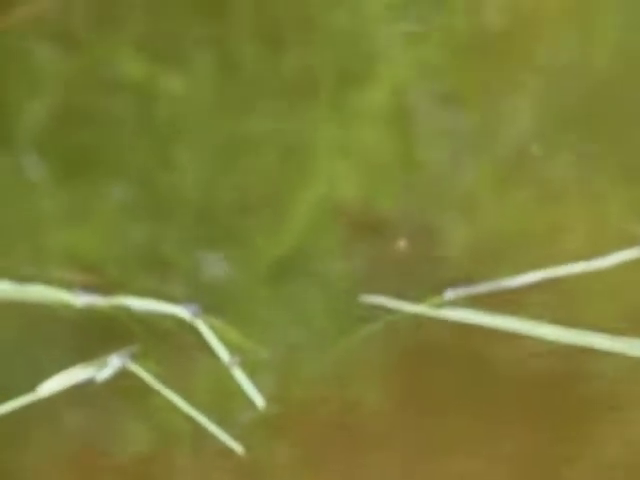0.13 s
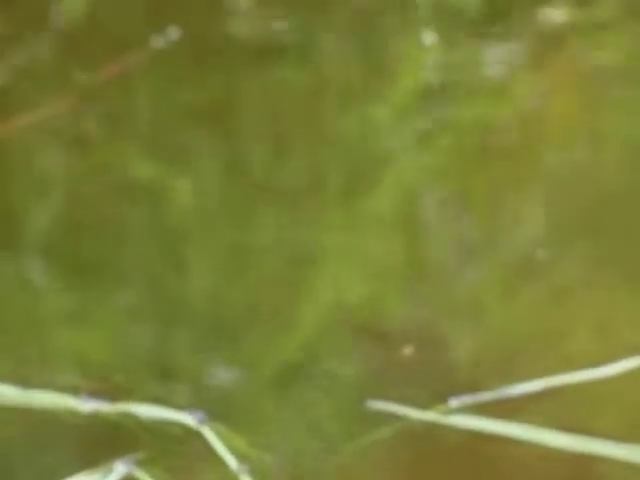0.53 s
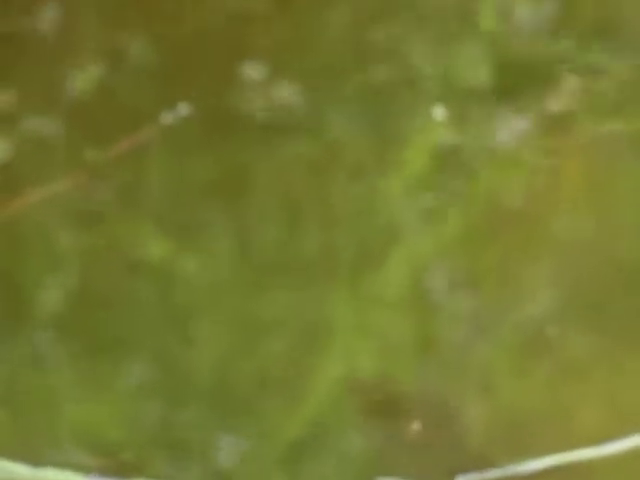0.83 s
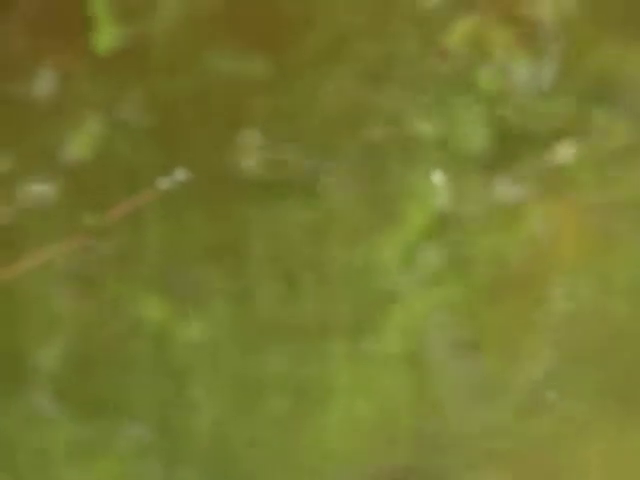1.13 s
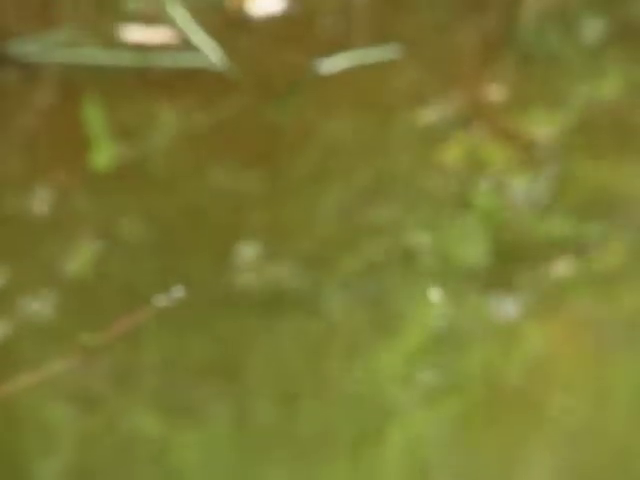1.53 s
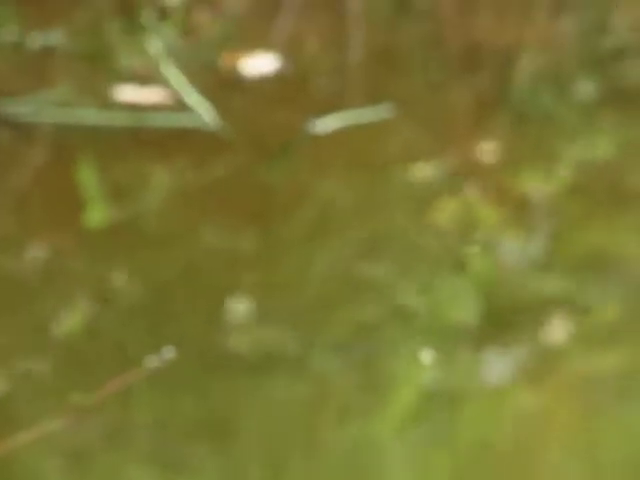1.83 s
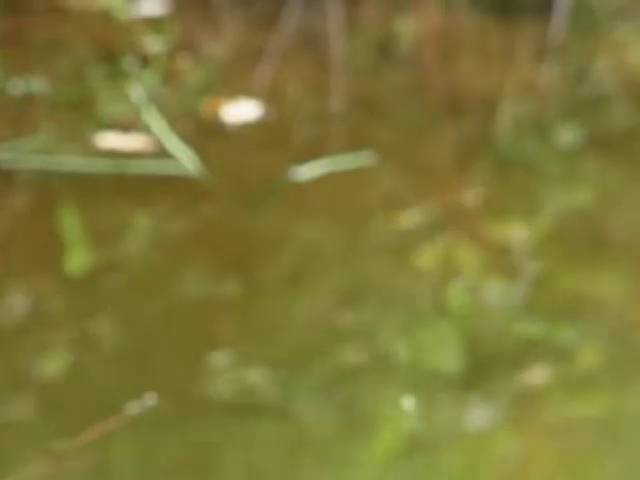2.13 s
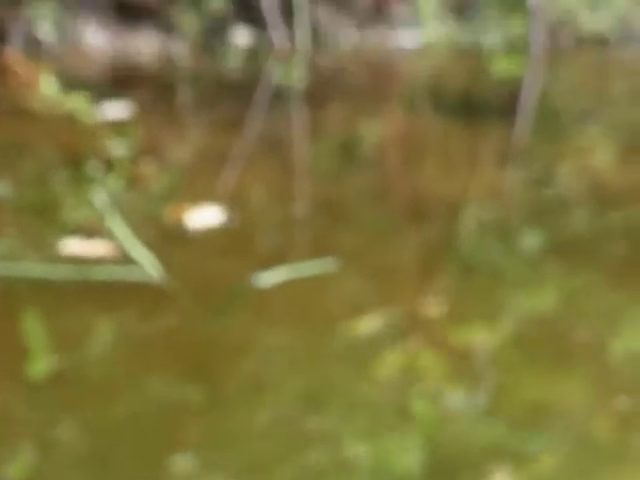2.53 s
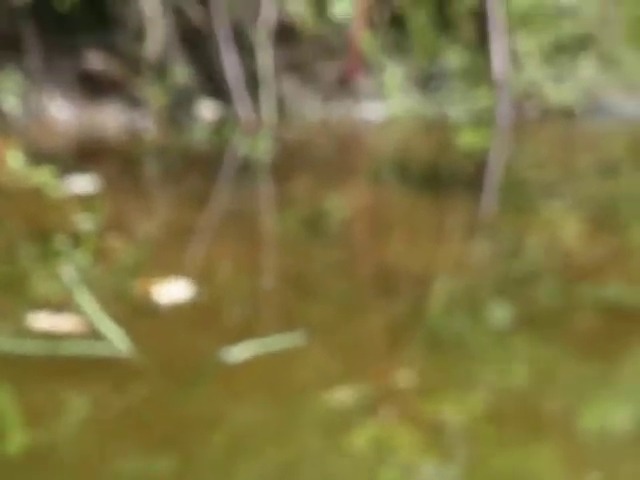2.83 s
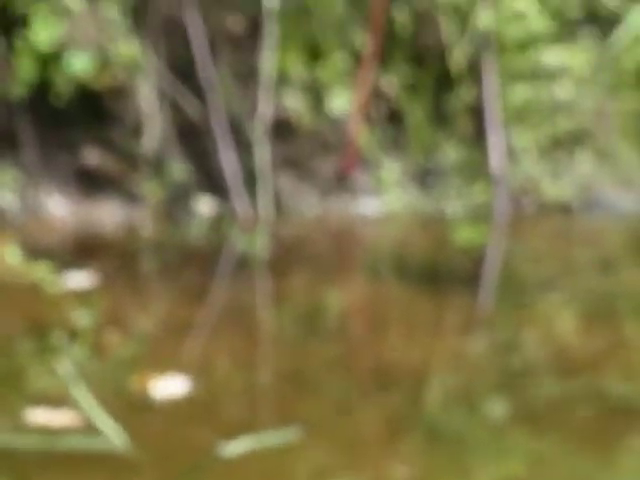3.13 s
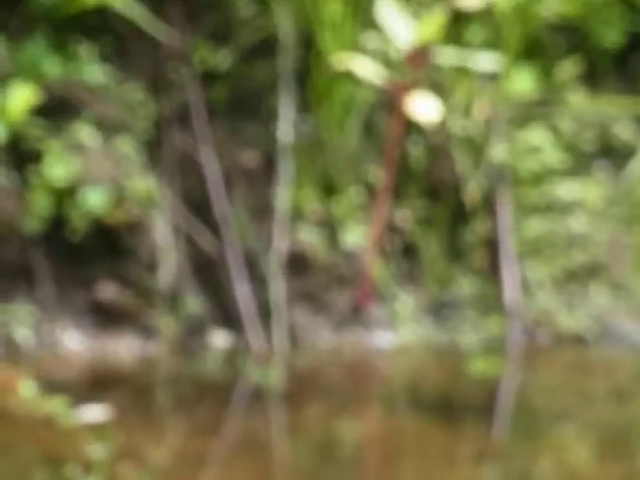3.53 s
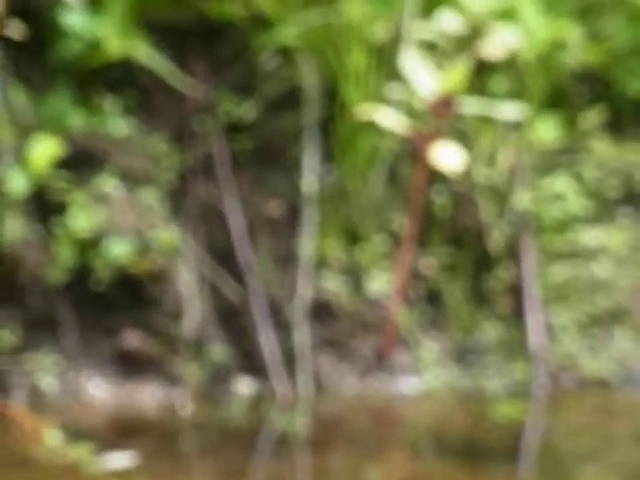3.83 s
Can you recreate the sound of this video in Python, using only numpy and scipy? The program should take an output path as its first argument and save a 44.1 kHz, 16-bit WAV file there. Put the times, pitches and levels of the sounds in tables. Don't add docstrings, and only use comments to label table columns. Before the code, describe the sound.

An unseen toad close by gives short, soft, even hoots beside a wooded pond; birds whistle and trill with echoes, fainter toads answer, and the hissy handheld camera microphone catches lens noise and a final sharp click.

```python
import sys
import numpy as np
from scipy import signal
from scipy.fft import rfft, irfft
from scipy.io import wavfile
from scipy.ndimage import uniform_filter1d

SR = 44100
rng = np.random.default_rng(int(sys.argv[2]) if len(sys.argv) > 2 else 0)


def wav_record(signal):
    frames = np.transpose(np.atleast_2d(signal))
    bounded = np.clip(frames, -1, 1)
    quanta = np.round(bounded * 32767).astype(np.int16)
    wavfile.write(sys.argv[1], SR, quanta)


def invert_db(level):
    return 10 ** (np.asarray(level, dtype=float) / 20)


N = 176400

# [f/Hz, density/dB]
AIR_SPECTRUM = [(25, -5), (55, -18), (140, -12), (280, -8.5), (480, -11.5), (1000, -17.5), (2500, -17.5),
                (15800, -24.5)]
# [start t/s, f/Hz, level/dB]
HOOTS = [(.086, 563.6, -37), (0.543, 562.6, -37), (.952, 563.4, -37), (1.37, 565.5, -36.5),
         (1.79, 564, -36.5), (2.22, 563, -37.5), (2.625, 563.7, -36.5), (3.047, 563.6, -37),
         (3.479, 563.5, -37), (3.91, 561, -37)]
# [t after start/s, level/dB, octave partial level/dB]
HOOT_COURSE = [
    (0, -19.5, -11),
    (.01, -2, -19.5),
    (.025, -0.5, -20.5),
    (.085, -4, -19.5),
    (.135, -4, -27),
    (0.151, -13, -13.5),
    (.168, -24, -32),
]
TOOTH_TIMES = [.1061, .1066, .1073, .1078, .1083, .1088, .1096]
# [level/dB, share of dull body as a factor]
TOOTH_HITS = [
    (-26.5, 0.045),
    (-20, .1),
    (-13.5, 0.47),
    (-25, 0.35),
    (-19, 0.1),
    (-25.5, 0.24),
    (-31.5, 2.1),
]
# [f/Hz, width/Hz, level/dB]
BARREL_MODES = [(332, 70, -15.5), (890, 290, -13.5), (1680, 320, -9.5), (2250, 580, -9.5), (4600, 840, -7),
                (7100, 670, -8.5), (9600, 800, -5), (11140, 520, -2.5), (13300, 700, -7.5),
                (15400, 800, -7)]
# [start t/s, length/s, from f/Hz, to f/Hz, level/dB]
FAR_WHISTLES = [(.11, 0.025, 5590, 5280, -59), (1.06, 0.0334, 5550, 5050, -59),
                (1.1, 0.015, 4420, 4200, -60), (2.08, 0.15, 1932, 1965, -67),
                (2.26, 0.03, 2246, 2110, -58.5), (2.5, 0.137, 2250, 2370, -65),
                (2.64, 0.039, 8320, 8500, -66), (3.27, 0.057, 8740, 8070, -66),
                (3.22, 0.048, 4680, 4240, -59), (3.47, 0.044, 3960, 3080, -56.5),
                (1.63, 0.011, 6650, 5180, -55), (1.95, 0.031, 3118, 3125, -57)]
# [start t/s, length/s, level/dB]
MOTOR_RUNS = [
    (.2, 0.42, -69.5),
    (1.227, 0.41, -65.5),
    (2.22, 0.56, -71.5),
    (3.23, 0.25, -68),
]
# [start t/s, length/s, from f/Hz, to f/Hz, level/dB]
FAR_TOADS = [
    (.24, 0.17, 511, 456, -63),
    (.79, 0.12, 507, 488, -65.5),
    (.92, 0.13, 492, 467, -63.5),
    (1.18, 0.17, 482, 470.7, -59),
    (1.69, 0.087, 505, 523, -61.5),
    (2.93, 0.13, 551, 515, -67),
    (3.06, 0.12, 487, 469, -63),
    (3.64, 0.36, 505.5, 470, -62),
]
# [level/dB, path of (t/s, f/Hz)]
WARBLER_PHRASES = [(-58, [(.437, 6600), (.45, 5200), (.465, 4850), (.505, 4730)]), (-53.5, [(1.354, 4410),
                   (1.366, 3590), (1.376, 3450)]), (-57.5, [(1.378, 3290), (1.384, 2784), (1.391, 3540),
                   (1.41, 3730)]), (-55, [(1.49, 4550), (1.501, 3620), (1.52, 3260)]), (-54, [(1.522, 2790),
                   (1.53, 3440), (1.575, 3910), (1.615, 3860)]), (-55, [(1.632, 3800), (1.645, 3850),
                   (1.66, 3170), (1.67, 2890), (1.678, 3510), (1.7, 3490)]), (-53, [(1.78, 4400),
                   (1.79, 3920)]), (-50, [(1.792, 3640), (1.806, 3070), (1.812, 2770)]),
                   (-51, [(1.815, 2615), (1.822, 3040), (1.834, 3500)]), (-50.5, [(2.21, 3384),
                   (2.232, 2815), (2.25, 2600)]), (-52, [(2.394, 1900), (2.403, 2695), (2.415, 3280),
                   (2.437, 3720)])]
# [level/dB, path of (t/s, f/Hz)]
NEAR_SONG = [(-52, [(1.195, 5200), (1.215, 4750), (1.25, 4540), (1.285, 4330)]), (-56.5, [(1.37, 8140),
             (1.42, 7860), (1.455, 7560), (1.475, 7450)]), (-49, [(1.71, 6450), (1.73, 6800), (1.745, 7110),
             (1.76, 6820), (1.775, 6180)]), (-48, [(2.503, 7600), (2.52, 6600), (2.54, 6720)]),
             (-48, [(2.525, 6680), (2.57, 6840), (2.67, 7100)]), (-45, [(2.72, 3680), (2.76, 3910),
             (2.81, 4225)]), (-47, [(2.868, 3480), (2.91, 3803), (2.945, 3970), (2.97, 4080)]),
             (-42.5, [(3.004, 5240), (3.012, 6130), (3.025, 6385), (3.11, 6455)]), (-41, [(3.372, 5250),
             (3.38, 5794), (3.415, 5880), (3.445, 4650)]), (-51, [(3.49, 8640), (3.5, 8230), (3.56, 8680)]),
             (-44.5, [(3.576, 5200), (3.58, 6670), (3.587, 6000)]), (-41.5, [(3.586, 5880), (3.592, 5280),
             (3.605, 4600), (3.632, 3650)]), (-39, [(3.685, 5440), (3.695, 6430), (3.72, 6363),
             (3.755, 4830)]), (-43, [(3.835, 7100), (3.87, 7100), (3.9, 7600), (3.935, 7200),
             (3.955, 6200)])]
# [start t/s, length/s, from f/Hz, to f/Hz, level/dB]
WARBLER_STROKES = [(1.21, 0.13, 2800, 2414, -63.5), (1.912, .016, 3700, 2700, -51),
                   (1.997, 0.012, 3700, 2650, -51), (2.077, 0.013, 3750, 2600, -49.5),
                   (2.124, 0.014, 3300, 2700, -52), (2.157, .014, 3800, 2650, -51.5),
                   (2.053, .014, 2700, 3500, -55), (1.963, .016, 3250, 2900, -54),
                   (2.495, 0.013, 3250, 2650, -52), (2.515, 0.017, 3350, 2600, -52),
                   (2.91, 0.021, 2590, 3200, -60), (2.545, .04, 2900, 2200, -61),
                   (1.24, .015, 3000, 3740, -59)]
# [t/s, level/dB, length/s]
LENS_TICKS = [
    (1.37, -45, 0.0019),
    (1.4, -48, 0.0034),
    (1.51, -53, 0.0043),
    (1.67, -49.5, 0.0069),
    (3.24, -48.5, 0.01),
    (3.441, -44, 0.0039),
]
# [f/Hz, level/dB]
TICK_COLOUR = [(250, 3), (800, -3.5), (2000, -5), (4000, -3), (7000, -4), (8700, -13), (11300, 4.5),
               (15500, -17)]
# [f/Hz, width/Hz, level/dB]
BUTTON_MODES = [(1620, 230, 2), (1990, 320, 6), (2400, 710, 1), (5700, 430, -27), (7600, 640, 2.5),
                (10130, 3100, 6.5), (11350, 1200, -4.5), (13950, 3700, 0)]


def evened(x):
    return x / np.sqrt(np.mean(x ** 2) + 1e-20)


def read(points, hz):
    f, value = np.transpose(points)
    return np.interp(np.log(hz + 1), np.log(f + 1), value)


def add(mix, s, sound):
    part = mix[round(s * SR):][:len(sound)]
    part += sound[:len(part)]


def colour(x, points):
    return irfft(rfft(x) * invert_db(read(points, np.fft.rfftfreq(len(x), 1 / SR))), len(x))


def passed(kind, hz, x):
    return signal.sosfilt(signal.butter(2, hz, kind, fs=SR, output="sos"), x)


def whistle(mix, db, path, soft=0.37, lean=0.57):
    s, hz = np.transpose(path)
    t = np.arange(s[0], s[-1], 1 / SR)
    progress = (t - s[0]) / (s[-1] - s[0])
    arch = abs(np.sin(np.pi * progress ** lean)) ** soft
    pitch = uniform_filter1d(np.interp(t, s, hz), size=90, mode="nearest")

    drift = uniform_filter1d(rng.standard_normal(16000), size=300)
    flutter = evened(uniform_filter1d(drift, size=300))[:len(t)]
    flutter = (flutter - flutter.mean()) * min(len(t) / SR / 0.08, 1)
    level = np.sqrt(2) * invert_db(db + 2.5 * flutter)
    add(mix, s[0], level * arch * np.sin(2 * np.pi * np.cumsum(pitch) / SR))


def glides(rows, lean=0.85):
    out = np.zeros(N)
    for start, length, from_hz, to_hz, db in rows:
        whistle(out, db, [(start, from_hz), (start + length, to_hz)], lean=lean)
    return out


def wood(x, echo_db, t60=0.61, near_db=-2.5, direct_db=0):
    t = np.arange(SR) / SR
    near, far = rng.standard_normal((2, SR))
    near = near * invert_db(-60 * t / 0.12)
    far = far * invert_db(-60 * t / t60) * np.minimum(t / 0.016, 1)
    tail = invert_db(near_db) * near / np.linalg.norm(near) + invert_db(echo_db) * far / np.linalg.norm(far)
    return invert_db(direct_db) * x + signal.fftconvolve(x, tail)[:N]


def air():
    frames, hz = N // 256 + 5, np.fft.rfftfreq(1024, 1 / SR)
    a, b, patches = rng.standard_normal((frames, 513, 3)).T
    patches = uniform_filter1d(patches, size=14, axis=0)
    patches = evened(uniform_filter1d(patches, size=16, axis=1))
    rumble_band = np.exp(-np.log((hz + 1) / 296) ** 2 / 0.24)
    fade_db = 1.14 * np.outer(rumble_band, np.arange(frames) * 256 / SR)
    z = (a + 1j * b) * invert_db(read(AIR_SPECTRUM, hz)[:, None] + 0.88 * patches - fade_db)
    return invert_db(-53.5) * evened(signal.istft(z, nperseg=1024, noverlap=768)[1][:N])


def near_toad():
    out, (s, level_db, octave_db) = np.zeros(N), np.transpose(HOOT_COURSE)
    t = np.arange(0, s[-1], 1 / SR)
    octave = invert_db(np.interp(t, s, octave_db))
    for start, hz, db in HOOTS:
        waver_db = evened(uniform_filter1d(rng.standard_normal(len(t)), size=900))
        shape = uniform_filter1d(invert_db(np.interp(t, s, level_db) + waver_db), size=300)
        pitch = hz - 63 * t - 13 * (t / s[-1]) ** 4
        turn = 2 * np.pi * np.cumsum(pitch) / SR
        add(out, start, np.sqrt(2) * invert_db(db) * shape * (np.sin(turn) + octave * np.sin(2 * turn)))
    return wood(out, echo_db=-21.5, t60=0.57, near_db=-24)


def gear_teeth():
    out, t = np.zeros(N), np.arange(900) / SR
    hz, width, mode_db = np.transpose(BARREL_MODES)[:, :, None]
    for s, (db, dull) in zip(TOOTH_TIMES, TOOTH_HITS):
        detune, phase = rng.random((2, len(hz), 1))
        cycles = hz * (0.96 + 0.074 * detune) * t + phase * (hz > 4000)
        rings = invert_db(mode_db) * np.exp(-np.pi * width * t) * np.sin(2 * np.pi * cycles)
        add(out, s, invert_db(db) * (np.where(hz < 6000, dull, 1) * rings).sum(axis=0))
    return passed("high", 220, out)


def birds():
    low, near = glides(WARBLER_STROKES), near_singer()
    warbler_phrases(low)
    slow, fast, between = chip_trills()
    return (wood(near, echo_db=-1.5, direct_db=-2)
            + wood(low, echo_db=0, near_db=-9)
            + wood(glides(FAR_WHISTLES), echo_db=1.5, t60=0.4, direct_db=-4.5)
            + wood(slow, echo_db=3.5, t60=0.5, near_db=-11, direct_db=3)
            + wood(between, echo_db=3, t60=0.41, direct_db=-8)
            + wood(fast, echo_db=-2.5, near_db=-16))


def lens_motor():
    whir, t = np.zeros(N), np.arange(N) / SR
    for s, length, db in MOTOR_RUNS:
        add(whir, s, invert_db(db) * signal.windows.tukey(round(length * SR), 0.7))
    bands = np.zeros(N)
    for hz in [10900, 11500, 9900]:
        slow = signal.lfilter([1], [1, -np.exp(-np.pi * 250 / SR)], rng.standard_normal(N))
        bands += evened(slow) * np.sin(2 * np.pi * hz * t)
    wide = evened(passed("band", [8500, 13500], rng.standard_normal(N)))
    return whir * (bands + invert_db(1.5) * wide)


def far_toads():
    return wood(glides(FAR_TOADS), echo_db=-1)


def warbler_phrases(low):
    for db, path in WARBLER_PHRASES:
        whistle(low, db, path, soft=0.29)


def near_singer():
    near = np.zeros(N)
    for db, path in NEAR_SONG:
        whistle(near, db, path, soft=0.34, lean=1.1)
    return near


def lens_ticks():
    faint = np.zeros(N)
    for s, db, length in LENS_TICKS:
        n = round(length * SR)
        add(faint, s, invert_db(db) * np.hanning(n) ** 0.42 * rng.standard_normal(1000)[:n])
    return 2 * colour(passed("high", 4300, faint), TICK_COLOUR)


def trill(first_s, step_s, length_s, count, from_hz, to_hz, db, swell_db):
    rows = [(first_s + k * step_s, length_s, from_hz, to_hz, db + k * swell_db) for k in range(count)]
    return glides(rows, lean=0.55)


def chip_trills():
    slow = trill(1.831, 0.0752, 0.024, 9, from_hz=5447, to_hz=3904, db=-53, swell_db=0.5)
    fast = trill(3.129, 0.0307, 0.007, 8, from_hz=6048, to_hz=4550, db=-54, swell_db=0.6)
    between = trill(1.868, 0.075, 0.022, 9, from_hz=5300, to_hz=3950, db=-56, swell_db=0.5)
    return slow, fast, between


def button():
    out, t = np.zeros(N), np.arange(900) / SR
    add(out, 3.642, invert_db(-49) * np.hanning(900) * np.sin(2 * np.pi * 133 * t))

    snap_s, snap_db, push_db = 3.8192, -0.5, -13
    body_s = snap_s + 0.000058
    rings = []
    for hz, width, db in BUTTON_MODES:
        decay = np.exp(-np.pi * width * t)
        rings.append(invert_db(db) * (width / 900) * decay * np.sin(2 * np.pi * hz * t))
    add(out, snap_s, -invert_db(snap_db) * sum(rings[3:]))
    add(out, body_s, invert_db(snap_db) * sum(rings[:3]))
    add(out, snap_s + 0.00235, invert_db(-30) * rings[1])

    add(out, body_s - 900 / SR, -invert_db(push_db) * np.exp(-t[::-1] / 0.00066))
    rebound = np.sin(np.pi * np.minimum(t / 0.0066, 1)) ** 2
    add(out, body_s, invert_db(push_db - 1.5) * (np.exp(-t / 0.0035) - 0.38 * rebound))
    return out


def scene():
    edge = signal.firwin(401, 15800, window=("kaiser", 9), fs=SR)
    pond = near_toad() + far_toads() + birds() + air()
    camera = lens_ticks() + lens_motor() + gear_teeth() + button()
    return (signal.oaconvolve(pond, edge, "same") + camera)[None]


def low_pass(x):
    return signal.sosfilt(signal.butter(12, 17350, fs=SR, output="sos"), x)


def record(dry):
    dry = signal.sosfilt(signal.butter(3, 50.5, "high", fs=SR, output="sos"), dry)
    power_db = 10 * np.log10(abs(uniform_filter1d(dry[0] ** 2, size=200)) + 1e-12)
    fall_db = np.arange(N) * 132 / SR
    held_peak_db = np.maximum.accumulate(power_db + fall_db) - fall_db
    over_db = np.maximum(held_peak_db + 15.5, 0)
    late_db = np.concatenate([np.zeros(220), over_db])[:N]
    ducked = dry / invert_db(0.48 * late_db)
    ceiling = 0.76
    held = ceiling * np.tanh(ducked / ceiling)
    edge = signal.firwin(401, 16700, window=("kaiser", 9), fs=SR)
    return low_pass(signal.oaconvolve(held, edge[None], "same"))


dry = scene()
out = record(dry)
wav_record(out)
```